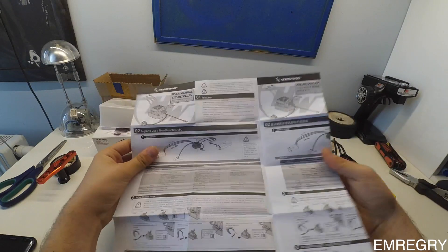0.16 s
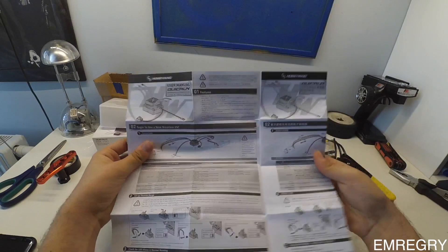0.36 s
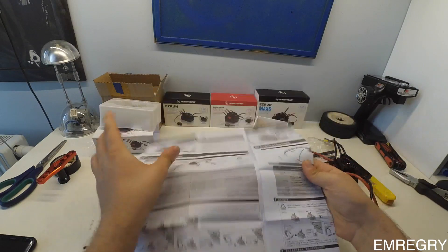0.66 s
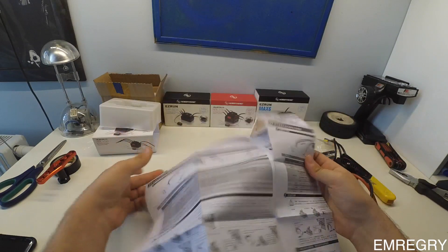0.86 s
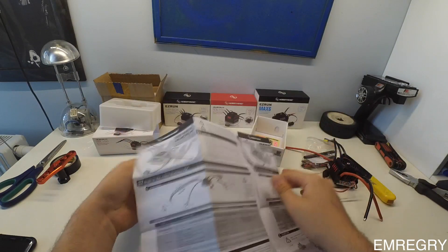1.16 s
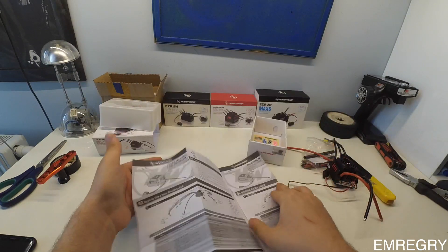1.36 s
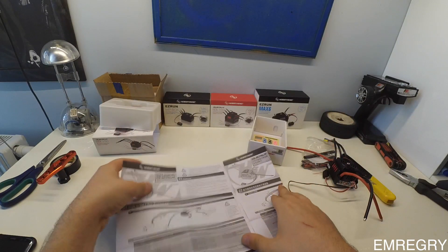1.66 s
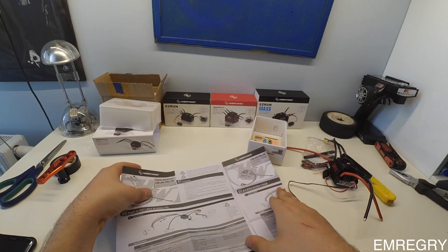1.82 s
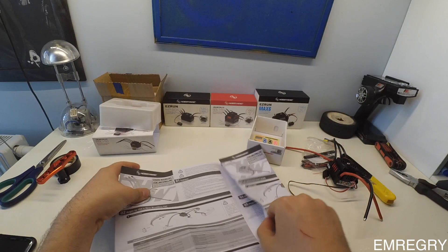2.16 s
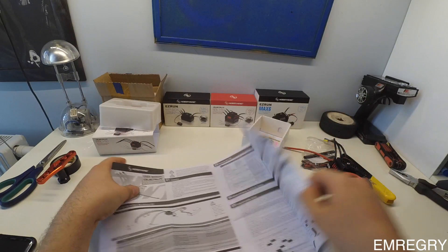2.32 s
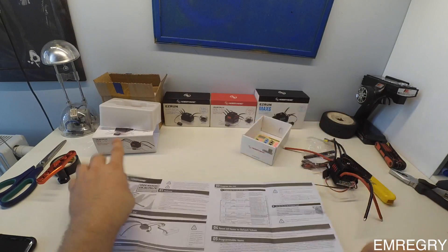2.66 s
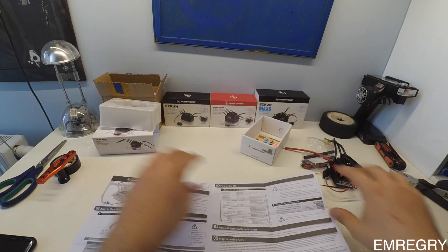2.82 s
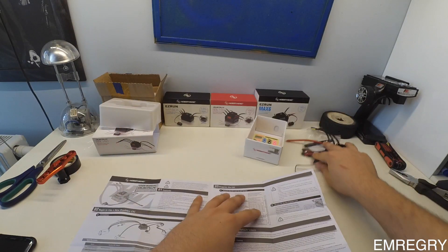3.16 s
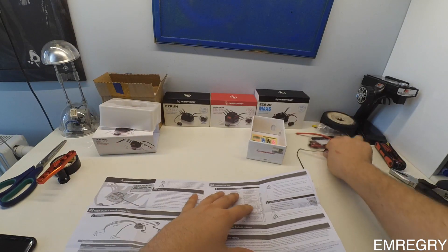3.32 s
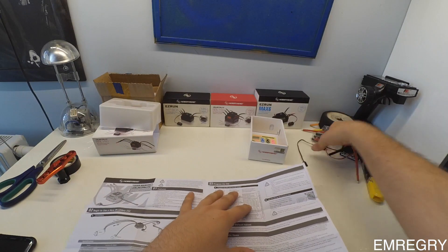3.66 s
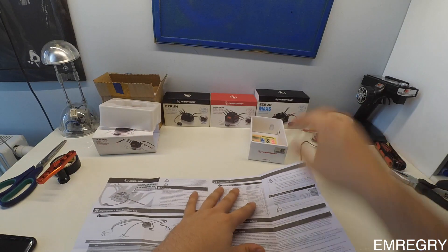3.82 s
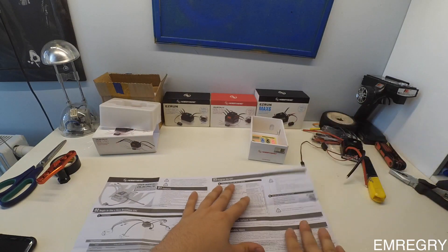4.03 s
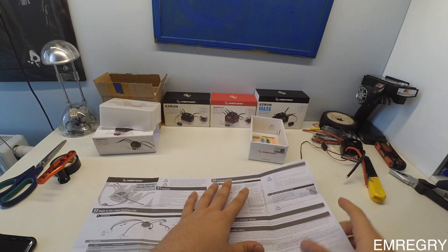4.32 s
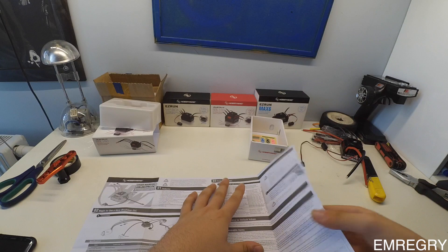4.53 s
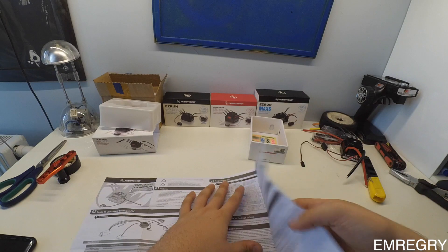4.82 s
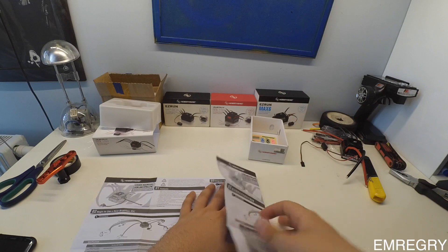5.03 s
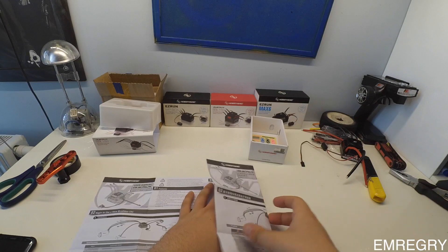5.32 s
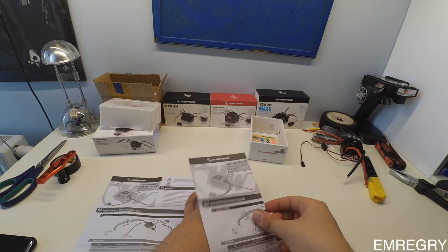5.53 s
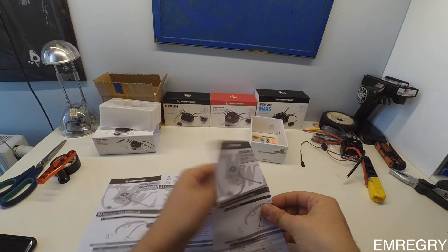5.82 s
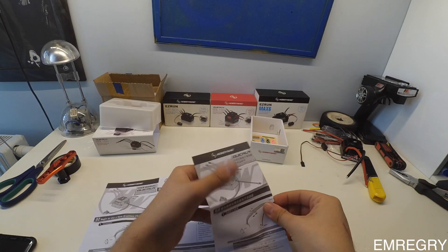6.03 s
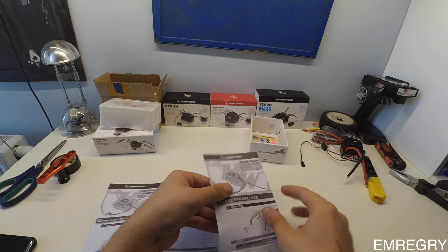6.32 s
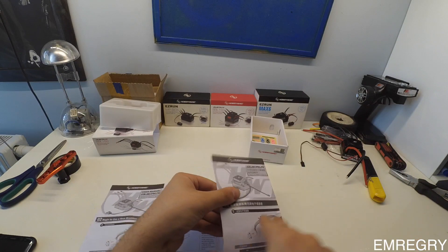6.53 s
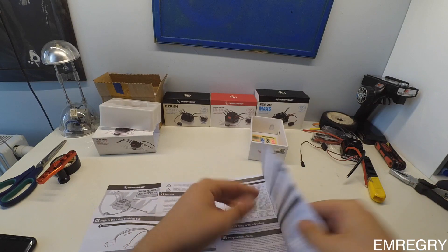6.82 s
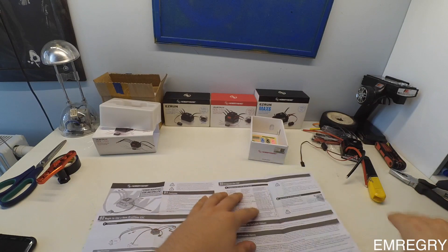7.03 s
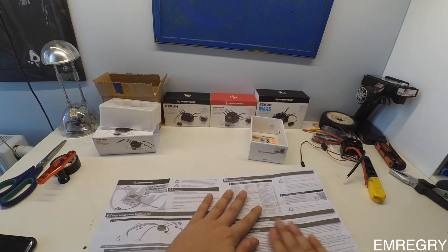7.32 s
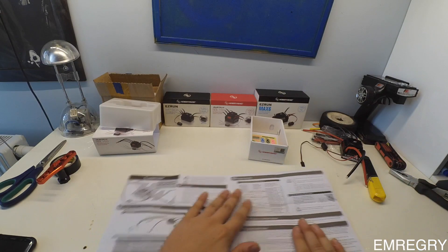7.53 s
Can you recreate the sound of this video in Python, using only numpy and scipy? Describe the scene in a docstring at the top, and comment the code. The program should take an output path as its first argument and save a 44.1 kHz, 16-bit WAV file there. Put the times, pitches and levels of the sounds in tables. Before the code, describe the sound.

A large paper sheet is handled close by in a small room, over a faint low rumble and hum. It starts with light rustling, then from about 0.8 to 1.5 seconds the sheet buckles in loud snaps, with a hollow wobble, flutter and a waft of air. Smaller crackles follow, and around 2.5 seconds it swings again, snapping and thumping onto the desk. From 3 to 3.7 seconds a small wired part clicks and is dragged aside with a hollow, jerky scrape while a hand hisses across the paper. Soft thumps come between 4 and 4.7 seconds, and a panel flaps and cracks until about 5. The folding peaks in sharp crease snaps from 5.4 to 6 seconds, then eases into lighter crinkling. Hands pat the sheet onto the desk near 7 and 7.3 seconds, and a brisk smoothing swish comes at about 7.6.

```python
"""A large paper sheet is flexed, laid on a desk, smoothed and refolded, close by in a small room.
Its creases buckle in sharp snaps over a fine crinkle; the sheet wobbles, flutters and wafts air.
Hands hiss across it and thump the desk. Midway one hand drags a small wired part aside,
with a hollow stick-slip scrape and a few clicks."""
import sys
import numpy as np
from scipy import signal
from scipy.io import wavfile
from scipy.ndimage import uniform_filter1d

SR = 44100
rng = np.random.default_rng(int(sys.argv[2]) if len(sys.argv) > 2 else 0)


def inscribe(sig):
    """Save sig as 16-bit PCM at rate SR to the path in sys.argv[1].

    A 1-D sig is mono; a 2-D sig holds one channel per row.
    Samples are clipped to [-1, 1] before scaling.
    """
    pcm = np.round(np.clip(np.atleast_2d(sig).T, -1, 1) * 32767)
    wavfile.write(sys.argv[1], SR, pcm.astype(np.int16))


N = 338247

# Table levels are relative. Spectra: (frequency [Hz], density [dB])
ROOM_TONE_SPECTRUM = [(15, 1), (30, 6), (55, -5), (80, -6), (140, -16), (300, -23), (600, -24.5),
                      (1500, -29), (5000, -45.5), (9000, -32.5), (15000, -35)]
WAFT_SPECTRUM = [(15, 10.5), (40, -8.5), (70, -1.5), (130, -3), (250, -12), (450, -19), (900, -49)]
FLUTTER_SPECTRUM = [(90, -23), (170, -2.5), (290, -1.5), (420, -5.5), (620, -5), (900, -8), (2000, -28.5),
                    (8000, -53)]
RUB_SPECTRUM = [(200, -33), (1200, -7), (3000, 0.5), (4700, 2), (7500, -0.5), (10000, -5.5), (15000, -13.5)]
CRINKLE_SPECTRUM = [(80, -14.5), (300, -0.5), (800, 1.5), (1400, 0.5), (2500, -4.5), (4000, -7),
                    (8000, -43.5), (15000, -42)]
SNAP_SPECTRUM = [(30, -3.5), (120, -8), (280, 0), (450, -6), (850, 0.5), (1200, 0.5), (1700, -2.5),
                 (3200, -2), (5200, -4.5), (7600, -9.5), (10000, -18.5), (15000, -29.5)]
# room decay: (frequency [Hz], T60 [s])
ROOM_DECAY = [(150, 0.47), (530, 0.22), (1400, 0.24), (3700, 0.19), (10000, 0.24)]

# movements: (start [s], length [s], level [dB])
SHEET_SWINGS = [(0.85, 0.56, -45), (2.443, 0.3, -40), (4.55, 0.58, -46.5), (5.6, 0.4, -56),
                (6.88, 0.15, -48)]
PART_DRAGS = [(3.01, 0.028, -46.5), (3.21, 0.45, -46.5)]
SHEET_FLUTTERS = [(1.0, 0.33, -46), (2.47, 0.22, -50), (4.6, 0.17, -44.5), (4.85, 0.19, -49)]
RUB_STROKES = [(0.0, 0.2, -55), (0.61, 0.12, -50.5), (1.12, 0.42, -53), (1.66, 0.073, -44.5),
               (1.96, 0.031, -42.5), (2.14, 0.13, -52.5), (2.34, 0.11, -47.5), (2.48, 0.29, -48.5),
               (3.03, 0.42, -43), (3.43, 0.47, -50), (4.13, 0.27, -47.5), (4.88, 0.05, -46.5),
               (5.29, 0.42, -55.5), (5.78, 0.14, -41.5), (5.96, 0.57, -55), (6.6, 0.87, -55.5),
               (7.3, 0.16, -50.5), (7.58, 0.14, -39)]
SHEET_BENDS = [(0.0, 0.025, -43.5), (0.6, 0.17, -48.5), (0.9, 0.27, -41.5), (1.2, 0.28, -43.5),
               (1.62, 0.47, -54), (2.47, 0.19, -45.5), (3.03, 0.36, -45.5), (3.4, 0.49, -54),
               (4.18, 0.34, -57), (4.84, 0.14, -45.5), (5.44, 0.11, -47), (5.71, 0.26, -42.5),
               (6.3, 0.18, -51), (6.62, 0.36, -52.5)]

# hands and sheet land on the desk: (time [s], sway level [dB], knock level [dB])
LANDINGS = [(1.011, -41, -40.5), (1.101, -38, -36), (2.332, -41, -31), (2.645, -36, -33.5),
            (3.006, -34, -38), (4.06, -41, -37), (4.367, -33.5, -44), (4.627, -32, -27), (5.95, -37, -45),
            (6.969, -35.5, -41), (7.014, -43, -34), (7.295, -29.5, -32)]
# desk sway, then knock: (frequency [Hz], decay [s])
THUMP_MODES = [(50, 0.048), (125, 0.022)]
# desk top under the part: (frequency [Hz], half-width [Hz], level [dB])
DESK_RESONANCES = [(312, 48, -8.5), (475, 34, 4), (700, 180, -10.5)]
# part catches and jerks free: (time [s], level [dB])
PART_JERKS = [(3.21, -33.5), (3.381, -26), (3.465, -42), (3.589, -40)]
# held sheet flips over: (time [s], level [dB])
SHEET_FLIPS = [(0.925, -29), (1.01, -11.5), (1.138, -25.5), (1.395, -21)]
# sheet wobble: (frequency [Hz], level [dB], decay [s])
WOBBLE_MODES = [(532, 2.5, 0.0059), (624, -5, 0.018)]

# snaps: (peak time [s], strength [dB], treble gain [dB], ring frequency [Hz])
PART_CLICKS = [(3.091, 3.5, 6.5, 2250), (3.1204, 2, -14, 4030), (3.2145, 5, 12, 3350), (3.4866, -6, 9, 430),
               (3.5355, -16.5, 20.5, 480), (3.6387, -15.5, 19, 480)]  # part and wires knock on the desk
SHEET_PATS = [(0.14, -21, 12, 920), (4.064, -15, 17.5, 1320), (5.0246, -2, -21, 1300),
              (5.061, -14, -31, 394), (6.3785, 0, -13, 845), (6.9702, 4, -6, 5170), (7.0151, -1, 0.5, 1770),
              (7.2944, 11.5, -4.5, 1350)]  # hand or flap pats the sheet down
PANEL_BUCKLES = [(0.616, -2.5, -18, 400), (0.694, -2.5, -5, 1760), (0.838, 6.5, -10, 810),
                 (0.914, 9.5, -11, 4910), (0.931, 16, -8.5, 4710), (1.0152, 18.5, -3.5, 3940),
                 (1.098, 10, -6.5, 620), (1.2115, 13, -17, 5900), (1.344, 12, -9, 900),
                 (1.384, 4, -9, 3830), (1.399, 12, -15, 900), (1.602, -6.5, -2, 1050),
                 (1.699, 3.5, -12, 1260), (1.737, -7, -2, 2020), (2.472, -7, -2, 1940),
                 (2.539, 14.5, -7.5, 7790), (2.711, -5, 3, 3100), (4.089, -9.5, 8, 396),
                 (4.396, -6.5, -12, 1920), (4.604, -3.5, -15, 292), (4.632, -4, -4, 280),
                 (4.939, -0.5, 9, 526), (5.453, 1.5, -17, 1300), (5.627, -8, -11, 1200),
                 (5.682, 12, -13, 1330), (5.863, -1.5, 4, 834), (5.892, -0.5, -6, 2030),
                 (5.959, 3.5, -6, 850), (6.707, -6, 8, 990), (6.72, 0.5, -4, 1310), (7.291, -4.5, -5, 1300)]  # panel bends until it gives
CREASE_CRACKS = [(0.102, -13.5, -8, 2660), (0.5145, -21.5, 11, 3200), (0.736, -4.5, -10, 1100),
                 (0.7755, -10.5, -7, 890), (1.006, 1, 9, 4600), (1.664, 0.5, -27, 970),
                 (1.7437, 8.5, -6.5, 1960), (2.1117, -3.5, -8.5, 4800), (2.2015, 5.5, -3, 560),
                 (2.4963, 0, 6.5, 4500), (2.5155, 8.5, -13, 1820), (2.6684, 4, 6, 3770),
                 (4.03, -17, 5, 1760), (4.4494, -6.5, 0, 2140), (4.584, -10, 0.5, 397),
                 (4.669, 2, -4, 5800), (4.7122, 10, 1.5, 2970), (4.726, 9, -8.5, 3640),
                 (5.3888, 8, -5.5, 4780), (5.4885, 15, -1.5, 440), (5.5813, -1, -18, 870),
                 (5.6656, 12.5, -12, 1100), (5.71, 18.5, -11.5, 6700), (5.7724, 8, -4, 3100),
                 (6.2139, -8, 2, 886), (6.2493, -0.5, -18, 1860), (6.2802, 3, -7.5, 920),
                 (6.412, -15, 11.5, 630), (6.4763, -10, 3, 5900), (6.5945, -7.5, 8, 940),
                 (6.608, -4, -3, 635)]  # crease gives at once


def amp(db):
    """Decibels to gain."""
    return 10 ** (np.asarray(db) / 20)


def unit(x):
    """Scale to rms 1."""
    return x / np.sqrt(np.mean(x ** 2) + 1e-20)


def lookup(points, hz):
    """Interpolate a table over log frequency."""
    points_hz, values = np.transpose(points)
    return np.interp(np.log(hz + 1), np.log(points_hz), values)


def add(mix, start_s, sound):
    """Mix a sound in at start_s."""
    part = mix[max(round(start_s * SR), 0):][:len(sound)]
    part += sound[:len(part)]


def colour(x, db_at_hz, size=4096):
    """Minimum-phase filter: attacks stay sharp."""
    log_gain = np.log(amp(db_at_hz(abs(np.fft.fftfreq(size, 1 / SR)))))
    response = np.fft.ifft(np.exp(np.conj(signal.hilbert(log_gain)))).real
    return signal.oaconvolve(x, response[:size // 2])[:len(x)]


def shaped(x, spectrum):
    """Filter by a spectrum table, to rms 1."""
    return unit(colour(x, lambda hz: lookup(spectrum, hz)))


def wander(per_s):
    """Slow random curve, rms 1."""
    knots = rng.standard_normal(N // 32)
    return unit(np.interp(np.arange(N) / SR * per_s, np.arange(len(knots)), knots))


def grains(per_s, spread_db):
    """Tiny slips at random times, a few far larger than the rest."""
    size = amp(spread_db * np.minimum(rng.exponential(1, N), 4))
    return unit(size * rng.choice([-1., 1.], N) * (rng.random(N) < per_s / SR))


def strokes(rows, rest_db, arch_db, attack_s, release_s):
    """Gain of a run of movements; arch_db is each one's middle relative to its ends."""
    t, power = np.arange(N) / SR, amp(rest_db) ** 2
    for start_s, length_s, db in rows:
        age_s = t - start_s
        progress = np.clip(age_s / length_s, 0, 1)
        fades = np.exp(np.minimum(age_s, 0) / attack_s - np.maximum(age_s - length_s, 0) / release_s)
        power = power + (amp(db - arch_db * (2 * progress - 1) ** 2) * fades) ** 2
    return np.sqrt(power)


def mode(hz, decay_s, rise_s):
    """One softly pushed, damped mode."""
    t = np.arange(SR // 3) / SR
    return np.sin(2 * np.pi * hz * t) * np.exp(-t / decay_s) * (1 - np.exp(-t / rise_s))


def room_tone(noise_db=-55, hum_hz=51, hum_db=-59):
    """Low rumble, wavering hum, thin hiss."""
    hum = np.sin(2 * np.pi * hum_hz * np.arange(N) / SR + 0.74 * wander(per_s=6.9))
    noise = shaped(rng.standard_normal(N), ROOM_TONE_SPECTRUM)
    return amp(noise_db) * noise + amp(hum_db) * unit(hum)


def room(x, wet_db=-7.5, predelay_s=0.006, echoes_per_s=4000, crossfade_hz=0.9):
    """Short tail off close walls; three echo patterns crossfade steadily to keep it uncoloured."""
    age_s, out = np.arange(SR // 2) / SR, x
    for phase in np.linspace(0, np.pi, 3, endpoint=False):
        echoes = rng.standard_normal(len(age_s)) * (rng.random(len(age_s)) < echoes_per_s / SR)
        hz, t, bands = signal.stft(echoes * (age_s > predelay_s), SR, nperseg=256)
        decay = amp(-60 * t / lookup(ROOM_DECAY, hz)[:, None])
        tail = signal.istft(bands * decay, SR, nperseg=256)[1]
        share = np.sqrt(2 / 3) * np.cos(2 * np.pi * crossfade_hz * np.arange(N) / SR + phase)
        out = out + amp(wet_db) * signal.oaconvolve(x * share, tail / np.linalg.norm(tail))[:N]
    return out


def waft(gain_db=-2, lumps_db=3.7):
    """The swinging sheet pushes air in soft lumps."""
    speed = strokes(SHEET_SWINGS, rest_db=-48, arch_db=-1, attack_s=0.16, release_s=0.046)
    air = rng.standard_normal(N) * amp(lumps_db * wander(per_s=25))
    return amp(gain_db) * speed * shaped(air, WAFT_SPECTRUM)


def thumps():
    """Each landing gives the desk a low sway and a knock."""
    out = np.zeros(N)
    for time_s, *levels_db in LANDINGS:
        for db, (hz, decay_s) in zip(levels_db, THUMP_MODES):
            add(out, time_s, amp(db) * mode(hz, decay_s, rise_s=0.0018))
    return out


def drag(gain_db=-2.5, jerk_decay_s=0.015):
    """The part sticks and slips; the desk top resonates, hollow."""
    def desk_db(hz):
        peaks = (amp(db) / (1 + ((hz - peak_hz) / half_width_hz) ** 2)
                 for peak_hz, half_width_hz, db in DESK_RESONANCES)
        return 20 * np.log10(sum(peaks))

    speed = strokes(PART_DRAGS, rest_db=-74, arch_db=2, attack_s=0.014, release_s=0.06)
    jerk = np.exp(-np.arange(SR // 5) / SR / jerk_decay_s)
    for time_s, db in PART_JERKS:
        add(speed, time_s, amp(db) * jerk)
    scrape = unit(colour(grains(per_s=700, spread_db=4.3), desk_db))
    return amp(gain_db) * uniform_filter1d(speed, size=256) * scrape


def flutter(lumps_db=4):
    """Loose panels flap against the air in dull, uneven beats."""
    speed = strokes(SHEET_FLUTTERS, rest_db=-74.5, arch_db=2, attack_s=0.018, release_s=0.016)
    flaps = grains(per_s=900, spread_db=2.6) * amp(lumps_db * wander(per_s=45))
    return speed * shaped(flaps, FLUTTER_SPECTRUM)


def flips():
    """The whole sheet pops through and wobbles with a hollow note."""
    out = np.zeros(N)
    wobble = sum(amp(db) * mode(hz, decay_s, rise_s=0.002) for hz, db, decay_s in WOBBLE_MODES)
    for time_s, db in SHEET_FLIPS:
        add(out, time_s, amp(db) * wobble)
    return out


def rub(gain_db=1.35, uneven_db=2.28):
    """Skin or paper slides on the sheet: fibres catch so densely that they hiss."""
    speed = strokes(RUB_STROKES, rest_db=-66.5, arch_db=3.5, attack_s=0.056, release_s=0.024)
    catches = grains(per_s=12000, spread_db=2.9) * amp(uneven_db * wander(per_s=90))
    return amp(gain_db) * speed * shaped(catches, RUB_SPECTRUM)


def crinkle(gain_db=-2.23, clump_db=3, tick_decay_s=0.0014):
    """Small buckles tick in clumps while the sheet bends."""
    flexing = strokes(SHEET_BENDS, rest_db=-60.5, arch_db=0.5, attack_s=0.0086, release_s=0.04)
    t = np.arange(SR // 40) / SR
    tick = rng.standard_normal(len(t)) * np.exp(-t / tick_decay_s)
    ticks = unit(signal.oaconvolve(grains(per_s=500, spread_db=2.7), tick)[:N])
    fine_grains = grains(per_s=4000, spread_db=2.6)
    clumps = amp(clump_db * wander(per_s=60))
    return amp(gain_db) * flexing * shaped((ticks + fine_grains) * clumps, CRINKLE_SPECTRUM)


def snaps(rows, swell_s, base_decay_s, quicken_per_db, body_db, thin_per_db, gain_db, spiky_db, ring_db):
    """A buckle or knock swells and scatters; one resonance rings. Strength alters decay and body."""
    out = np.zeros(N)
    lead_s = 2 * swell_s
    age_s = np.arange(SR // 8) / SR - lead_s
    for peak_s, strength_db, treble_db, ring_hz in rows:
        decay_s = base_decay_s * np.exp(-quicken_per_db * strength_db)
        envelope = np.exp(np.minimum(age_s / swell_s, -age_s / decay_s))
        scatter, spikes = rng.standard_normal((2, len(age_s)))
        burst = envelope * scatter * amp(spiky_db * spikes)
        tilt = [(600, body_db - thin_per_db * strength_db), (2500, 0), (9000, treble_db)]

        def snap_db(hz):
            ring_power = amp(ring_db) ** 2 / (1 + ((hz - ring_hz) / (0.085 * ring_hz)) ** 2)
            return lookup(SNAP_SPECTRUM, hz) + lookup(tilt, hz) + 10 * np.log10(1 + ring_power)

        snap = colour(burst / np.linalg.norm(burst), snap_db, size=2048)
        add(out, peak_s - lead_s, amp(strength_db + gain_db) * snap)
    return out


def scene():
    """All sources straight ahead: identical channels."""
    cracks = snaps(CREASE_CRACKS, swell_s=0.000484, base_decay_s=0.0069, quicken_per_db=0.02,
                   body_db=-1, thin_per_db=0.44, gain_db=0.5, spiky_db=2.5, ring_db=8.5)
    buckles = snaps(PANEL_BUCKLES, swell_s=0.0042, base_decay_s=0.011, quicken_per_db=0.1,
                    body_db=2.5, thin_per_db=0.26, gain_db=0.5, spiky_db=3.5, ring_db=8.5)
    pats = snaps(SHEET_PATS, swell_s=0.0011, base_decay_s=0.014, quicken_per_db=0.04,
                 body_db=3, thin_per_db=0.6749, gain_db=0.57, spiky_db=5, ring_db=6.5)
    clicks = snaps(PART_CLICKS, swell_s=0.0005, base_decay_s=0.0046, quicken_per_db=-0.16,
                   body_db=-4, thin_per_db=0.2, gain_db=-1.5, spiky_db=2, ring_db=12)
    paper = cracks + buckles + pats + flips() + flutter() + crinkle() + rub()
    mono = room(paper + clicks + drag()) + waft() + thumps() + room_tone()
    return np.array([mono, mono])


def record(dry, hiss_db=-79, cutoff_hz=15600):
    """Faint hiss per channel, then a low-pass."""
    noisy = dry + amp(hiss_db) * rng.standard_normal(dry.shape)
    low_pass = signal.firwin(401, cutoff_hz, window=("kaiser", 9), fs=SR)
    return signal.oaconvolve(noisy, low_pass[None], "same")


dry = scene()
out = record(dry)
inscribe(out)
```